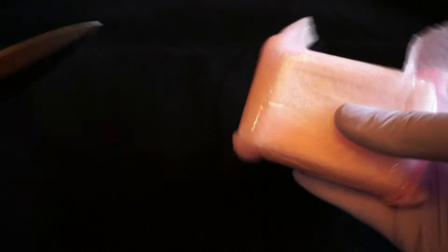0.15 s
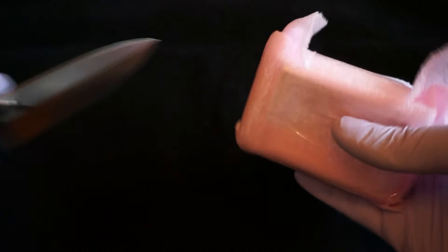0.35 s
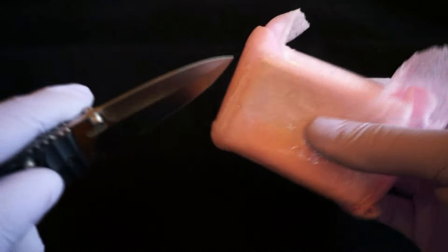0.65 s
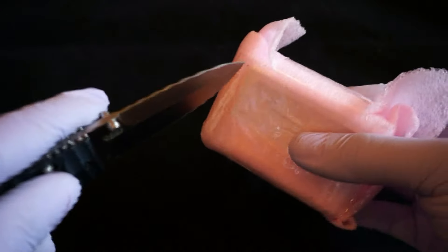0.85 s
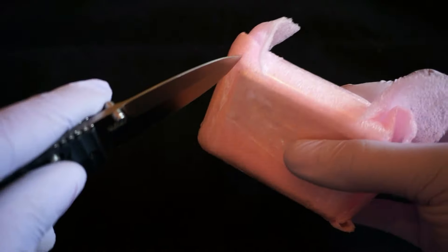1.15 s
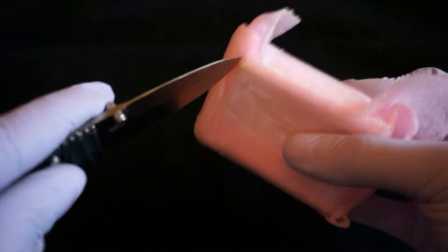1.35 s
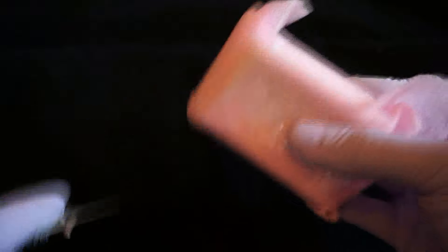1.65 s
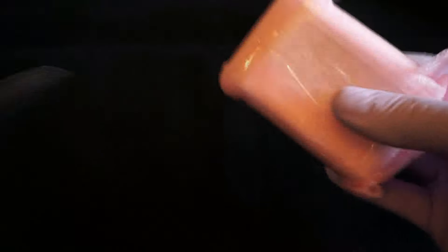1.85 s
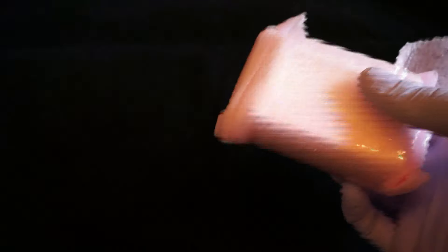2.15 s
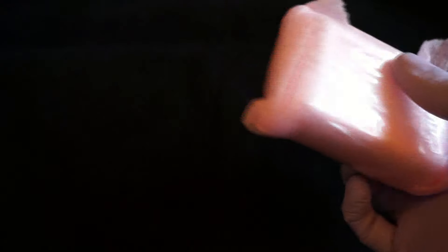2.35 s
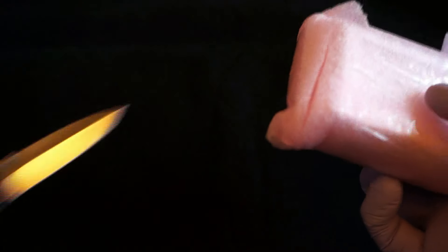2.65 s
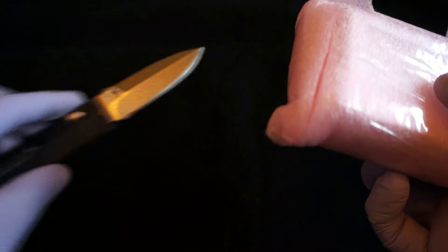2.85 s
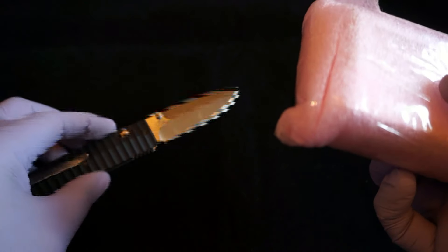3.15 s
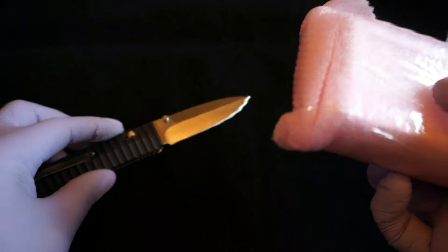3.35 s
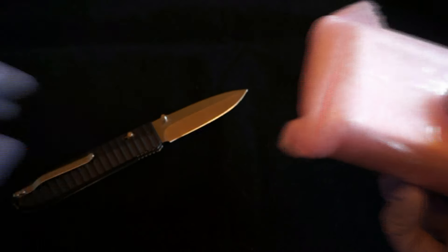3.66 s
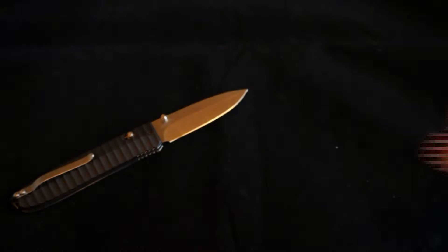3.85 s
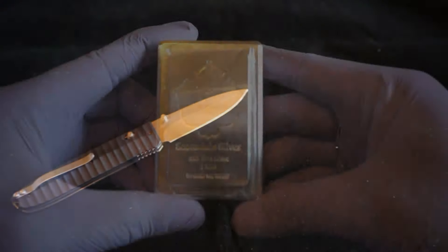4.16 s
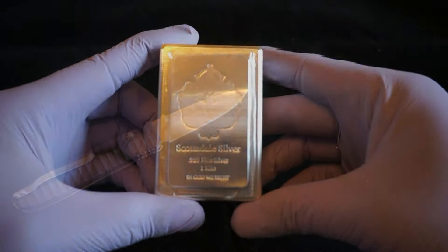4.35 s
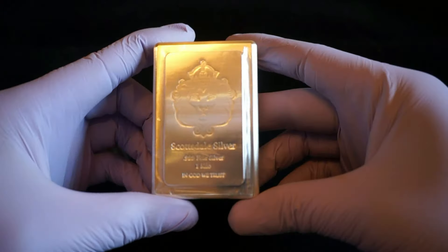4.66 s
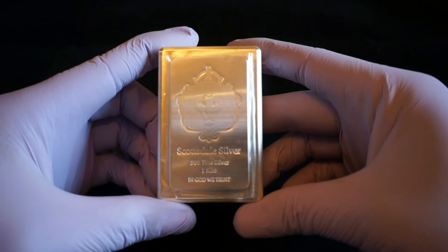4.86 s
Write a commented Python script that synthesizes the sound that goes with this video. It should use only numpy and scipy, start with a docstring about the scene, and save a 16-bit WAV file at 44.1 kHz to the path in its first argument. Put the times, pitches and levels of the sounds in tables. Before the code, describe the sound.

A quiet room, heard very close in stereo, with faint hiss, a barely audible hum in the first second and short room echo. From 0.15 to 0.85 s gloves stutter over foam in tiny squeaks, bright chirps around 0.2 s, lower groaning ones with a rasp near 0.4 s, then thinner, fainter ones. Dry snaps tick at 0.73, 0.78 and 0.92 s amid fine rustling. Small ticks and a faint creak lead up to the cut: at 1.5 s the foam rips with loud, sharp snaps, creaks about 1.6 s, and rips again at 1.67 s. A falling squeak comes at 2.05 s, then soft crumpling with a crisp snap at 2.6 s. After a faint touch at 3.25 s, the knife lands around 3.6 s in a quick dull triple clatter. Light squeaks on plastic follow at 3.96 to 4.3 s, with a muffled bump near 4.96 s.

```python
"""Foam wrapper cut open

Gloved hands slit a foam wrapper with a knife, close to a microphone pair in a quiet room.
Stick-slip pulse trains squeak (gloves on foam, then on a plastic case) and creak (blade in foam).
Dense impulses rip in two short bursts; damped sines snap; crackle rustles; filtered noise rasps and slides.
Knocks on the table are a push, a clatter and ringing modes; a faint hum and hiss lie beneath."""
import sys
import numpy as np
from scipy import signal
from scipy.fft import rfft, irfft, next_fast_len
from scipy.io import wavfile
from scipy.ndimage import map_coordinates

SR = 44100
rng = np.random.default_rng(int(sys.argv[2]) if len(sys.argv) > 2 else 0)


def to_wav(s):
    """Save 16-bit WAV."""
    ch = np.atleast_2d(s).T  # columns
    pcm = np.round(np.clip(ch, -1, 1) * 32767)  # PCM
    wavfile.write(sys.argv[1], SR, pcm.astype(np.int16))


N = 220361
TIME_S = np.arange(N) / SR
TOP_HZ = 15900  # band limit of the recorder

# glove strokes on foam: [start t/s, length/s, crest/share 0-1, level/dB, first slip f/Hz, last slip f/Hz,
# bow of glide/octaves, roughness/0-1, spot resonance f/Hz]
FOAM_STROKES = [ (.144, 0.04, 0.67, -33.5, 788, 765, 0.03, 0.59, 3260),
                (.191, 0.026, 0.46, -28, 1210, 2235, -0.0071, 0.23, 3480),
                (.209, .032, 0.63, -25, 2191, 2555, -.1, .6, 4600),
                (.232, 0.044, 0.43, -24, 2708, 1007, -0.2, 0.5, 3970),
                (.384, 0.052, 0.86, -29.5, 489.3, 505, 0.32, 0.19, 2030),
                (.42, 0.068, 0.81, -31, 490.5, 383, 0, 0.44, 2060),
                (.501, 0.038, 0.4, -30, 3300, 1814, -0.12, 0.17, 5200),
                (.527, 0.066, 0.6, -37.5, 1798, 2124, 0.07, 0.17, 5570),
                (.592, .014, 0.56, -33, 2350, 5000, .05, .1, 3430),
                (.622, .061, 0.45, -39.5, 819, 493, 0.17, 0.07, 1700),
                (.695, .032, 0.67, -40, 3100, 12940, -0.056, 0.3, 5350),
                (.787, 0.046, 0.3, -43.5, 13000, 3960, 0, 0.27, 6600),
                (.81, .032, 0.3, -40.5, 3785, 1280, -0.0093, 0.4, 2320),
                (1.994, 0.067, 0.35, -39.5, 5300, 6570, 0.33, 0.37, 6900),
                (2.055, 0.082, 0, -28.5, 6855, 1560, 0.25, 0.2, 5050),
                (2.054, 0.073, 0.28, -36, 3390, 1308, 0.02, 0.58, 3270), ]
# spectrum of a squeak: [f/Hz, level/dB]
SQUEAK_COLOUR = [(100, -36), (450, -17.5), (1100, -3.5), (2050, 0.5), (2750, 2), (3900, 0), (6400, -8.5),
                 (15000, -30)]


def foam_squeaks():
    """Gloves stick and slip on foam; each slip is one pulse."""
    strokes = glides(FOAM_STROKES, rise_db=5.5, fall_db=8, shape=1.02)
    return stick_slip(strokes, SQUEAK_COLOUR, jitter=0.125, jitter_rate_hz=500, flutter_db=2.5,
                      hiss=0.97, pure_hz=3870, ring=0.9)


# blade in the cut, one curve per creak: [t/s, slip f/Hz, level/dB]
CREAK_CURVES = [
    [(1.375, 235.3, -40), (1.4, 213.3, -39)],
    [(1.575, 328.3, -32.5), (1.594, 283.3, -25), (1.607, 317.2, -25), (1.629, 327.5, -23.5),
     (1.664, 307.8, -24)],
]
# spectrum of a creak: [f/Hz, level/dB]
CREAK_COLOUR = [(100, -59), (320, -25), (620, -8.5), (1400, -6.5), (2000, -12.5), (2700, -4.5),
                (3700, -6.5), (5200, -20), (15000, -33)]


def blade_creaks(spot_hz=2900, rough=0.096):
    """The blade sticks and slips slowly enough to creak; each curve is one push."""
    strokes = []
    for curve in CREAK_CURVES:
        knot_s, slip_hz, level_db = np.transpose(curve)
        length_s = knot_s[-1] - knot_s[0]
        t = knot_s[0] + span(length_s) * length_s
        hz, db = np.interp(t, knot_s, slip_hz), np.interp(t, knot_s, level_db)
        strokes.append((knot_s[0], rough, spot_hz, hz, db))
    return stick_slip(strokes, CREAK_COLOUR, jitter=0.19, jitter_rate_hz=285, flutter_db=1.8,
                      hiss=2.2, pure_hz=np.inf, ring=0.41)


# foam giving way: [start t/s, length/s, level/dB, sag over length/dB, lower edge f/Hz]
RIPS = [(1.490, 0.035, -18, 12, 920), (1.666, .036, -18, .5, 300)]
# spectrum of a rip: [f/Hz, level/dB]
RIP_COLOUR = [(100, -43.5), (457, -10), (1700, -1), (4460, -3.5), (15500, -13.5)]
STRAIN_DB, STRAIN_S = -9, 0.0043  # first cells, ahead of the rip: level re rip, rise time constant
SETTLE_DB, SETTLE_S = -11.5, 0.018  # last cells, after it: level re sagged rip, decay time constant


def rips():
    """Cell walls burst in a dense volley: strain builds, the foam gives, the force sags and stops."""
    out = np.zeros(N)
    for start_s, length_s, db, sag_db, low_hz in RIPS:
        cells = crackle(rate_hz=7000, spread_db=2.5) + .5 * rng.standard_normal(N)

        def foam(x):
            """Foam colour above the lower edge."""
            return passed(coloured(x, RIP_COLOUR), low_hz, "highpass", order=1)

        t = TIME_S - start_s
        strain = amp(STRAIN_DB) * np.exp(-np.abs(t) / STRAIN_S)
        settle = amp(SETTLE_DB - sag_db) * np.exp(-np.abs(t - length_s) / SETTLE_S)
        run = amp(-sag_db * np.clip(t / length_s, 0, 1))
        force = amp(db) * np.select([t < 0, t < length_s], [strain, run], settle)
        out += foam(force * cells) / np.std(foam(cells))
    return out


# single snaps of the wrapper: [t/s, peak level/dB, centre f/Hz]
SNAPS = [(.7333, -19, 4230), (.783, -25, 5670), (.922, -28, 3750), (1.185, -34, 3630), (1.205, -33, 2230),
         (1.227, -29, 6370), (1.3755, -31, 4670), (1.516, -11, 5500), (1.518, -5.5, 6600),
         (1.538, -16.5, 7500), (1.5726, -14, 6560), (2.45, -31.5, 3000), (2.5, -36, 1500),
         (2.5673, -28.5, 5360), (2.594, -20, 3380), (2.64, -37, 3500), (2.696, -36, 3480),
         (3.0242, -38.5, 2230), (3.722, -34.5, 3880)]


def snaps(cycles=1.33, fizz=0.38, fizz_t60_s=0.0067):
    """The taut skin swings a cycle or two with a short noise spray; so light a skin gives no bass."""
    out, t = np.zeros(N), np.arange(SR // 50) / SR
    for start_s, peak_db, hz in SNAPS:
        ring = np.sin(2 * np.pi * hz * t) * np.exp(-hz * t / cycles)
        noise = fizz * rng.standard_normal(len(t)) * amp(-60 * t / fizz_t60_s)
        spray = passed(noise, 2 * hz, "lowpass", order=2)
        click = passed(ring + spray, hz / 4, "highpass", order=2)
        add(out, start_s, amp(peak_db) * click / np.abs(click).max())
    return out


# strokes on the hard plastic case: [start t/s, length/s, crest/share 0-1, level/dB, first slip f/Hz,
# last slip f/Hz, bow of glide/octaves, roughness/0-1, spot resonance f/Hz]
CASE_STROKES = [ (3.96, 0.041, 0.54, -34.5, 998, 2270, -0.11, 0.15, 3200),
                (3.997, 0.052, .25, -40.5, 1734, 1902, -0.12, 0.75, 1900),
                (4.156, .068, 0.45, -36.5, 1787, 3147, .38, 0.31, 6040),
                (4.203, .044, 0.16, -39, 2482, 1628, -0.023, 0.43, 2180),
                (4.275, 0.046, 0.6, -53.5, 6000, 7040, 0.065, 0.83, 6800), ]


def case_squeaks():
    """Gloves stick and slip on plastic; fast slips round off at a lower rate than on foam."""
    strokes = glides(CASE_STROKES, rise_db=12, fall_db=7.5, shape=0.77)
    return stick_slip(strokes, SQUEAK_COLOUR, jitter=0.089, jitter_rate_hz=500, flutter_db=-0.5,
                      hiss=1.0, pure_hz=1800, ring=0.62)


# glove dragged over foam: [start t/s, length/s, crest/share 0-1, level/dB]
SCRATCHES = [(.388, 0.12, 0.5, -37.5), (2.055, 0.11, 0.2, -45.5)]


def scratch():
    """The glove drags over open cells: a bright, fluttering rasp that swells and fades."""
    bright = passed(crackle(rate_hz=15000, spread_db=5.5), [5000, 13000], "bandpass", order=1)
    rasp = unit(bright * amp(1.8 * wobble(500, N)))
    return rubs(SCRATCHES, rise_db=8, fall_db=14, shape=1.8) * rasp


# blows on the table: [t/s, level/dB, softness as cut-off f/Hz, time for clatter to fall 30 dB/s]
KNOCKS = [(3.246, -44, 553, 0.1), (3.6107, -25.5, 1590, 0.036), (3.622, -25, 1480, 0.14),
          (3.644, -28.5, 1660, 0.07), (4.101, -54, 940, 0.43), (4.752, -56, 2120, .13),
          (4.964, -39.5, 360, 0.038)]
# modes of the table top: [f/Hz, relative level/dB]
TABLE_MODES = [(290, 0), (600, 7.5), (662, 8.5), (774, 1.5), (1175, -6.5), (1308, -5)]


def knocks(ring_db=-12.5, ring_t60_s=0.18, clatter_db=0.5, push_s=0.00048):
    """Knife and hands meet the cloth-covered table: a dull push, a clatter and the top's modes."""
    out, t = np.zeros(N), np.arange(SR // 2) / SR
    for start_s, db, soft_hz, length_s in KNOCKS:
        ring = np.zeros(len(t))
        for hz, mode_db in TABLE_MODES:
            gain = amp(mode_db + rng.normal(0, 0.44)) * rng.choice([-1, 1])
            ring += gain * np.sin(2 * np.pi * hz * t)
        noise = unit(passed(rng.standard_normal(len(t)), [280, 1800], "bandpass", order=2))
        clatter = noise * amp(-60 * t / (2 * length_s))
        u = t / push_s
        push = 4 * (1 - u) * np.exp(-u)
        impact = amp(ring_db - 60 * t / ring_t60_s) * ring + amp(clatter_db) * clatter + push
        blow = passed(impact, soft_hz, "lowpass", order=4)
        add(out, start_s, amp(db) * passed(blow, 110, "highpass", order=7))
    return out


# wrapper and gloves shifting in the hand: [start t/s, length/s, crest/share 0-1, level/dB]
RUSTLES = [(0, 0.25, 0, -56.5), (.2, 0.81, .5, -51), (.9, 2.48, 0.42, -56.5), (1.43, 0.058, 0.7, -50),
           (3.77, 0.13, 0.77, -53.5), (3.87, 0.55, 0.43, -57)]
# spectrum of the fine crackle: [f/Hz, level/dB]
RUSTLE_COLOUR = [(200, -24.5), (1400, 0.5), (3000, -1), (15000, -7)]
# thumb working the wrapper: [start t/s, length/s, crest/share 0-1, level/dB]
CRUMPLES = [(2.19, 0.14, 0.6, -52), (2.56, 0.29, 0.34, -50.5)]
# spectrum of the coarse crackle: [f/Hz, level/dB]
CRUMPLE_COLOUR = [(150, -41), (700, -2.5), (2500, 6), (15000, -9.5)]


def rustle():
    """Fine crackle of the wrapper as it is held, coarser clumps where the thumb presses."""
    fine = unit(coloured(crackle(rate_hz=3200, spread_db=2.0), RUSTLE_COLOUR))
    fine = fine * amp(2.8 * wobble(29.976, N))
    coarse = coloured(crackle(rate_hz=1700, spread_db=5), CRUMPLE_COLOUR)
    coarse = unit(coarse * amp(2.8 * wobble(70, N)))
    held = rubs(RUSTLES, rise_db=-4, fall_db=16.0, shape=2.7) * fine
    pressed = rubs(CRUMPLES, rise_db=16, fall_db=17, shape=2.5) * coarse
    return held + pressed


# sleeve sliding on the table: [start t/s, length/s, crest/share 0-1, level/dB]
SLIDES = [(.37, 0.73, 0.13, -63.5), (3.04, .36, .37, -66.5)]


def slide():
    """Soft rubbing brings out one low band of the table, a hollow drone."""
    drone = unit(passed(rng.standard_normal(N), [295, 410], "bandpass", order=2))
    return rubs(SLIDES, rise_db=11, fall_db=8.5, shape=1.1) * drone


# faint hum in the room: [start t/s, length/s, crest/share 0-1, level/dB]
HUMS = [(0, 1.12, 1, -66.5)]


def hum(centre_hz=392):
    """A thin, faint tone that wavers a little as it swells."""
    phase = 2 * np.pi * np.cumsum(centre_hz + 2 * wobble(9.5, N)) / SR
    return rubs(HUMS, rise_db=8, fall_db=3, shape=0.71) * unit(np.sin(phase))


# spectrum of the noise floor: [f/Hz, level/dB]
FLOOR_COLOUR = [(24, -116), (40, -36), (333, -8), (1160, -11), (1280, -4), (1910, -12), (3840, -14),
                (4900, -4.5), (5440, -16), (15500, -12.5)]


def floor():
    """Faint room air and microphone hiss: coloured noise, partly different in each channel."""
    mid, side = unit(coloured(rng.standard_normal((2, N)), FLOOR_COLOUR))
    return amp(-61.5) * np.array([mid + 0.34 * side, mid - 0.25 * side])


# spectrum of the echo at its start: [f/Hz, level/dB]
ROOM_COLOUR = [(150, -7.5), (2500, -3.5), (14000, -2)]
# echo decay by 60 dB: [f/Hz, time/s]
ROOM_T60 = [(200, 0.44), (4000, 0.38), (15000, 0.26)]


def room(x, wet_db, width):
    """The room's answer, mostly common to both channels; treble dies first."""
    hz, t, z = signal.stft(rng.standard_normal((2, SR // 2)), SR, nperseg=256)
    decay_db = along(ROOM_COLOUR, hz)[:, None] - 60 * t / along(ROOM_T60, hz)[:, None]
    tail = signal.istft(z * amp(decay_db), SR, nperseg=256)[1]
    tail = np.pad(tail / np.linalg.norm(tail[0]), ((0, 0), (SR // 250, 0)))  # 4 ms pre-delay
    mid, side = amp(wet_db) * signal.fftconvolve(x[None], tail, axes=1)[:, :N]
    side = width * passed(side, [260, 5000], "bandpass", order=1)
    return np.array([mid + side, mid - side])


def placed(x, lean, wet_db, beam_hz):
    """Lean left (+) or right (-) in the middle band; treble above beam_hz hardly reaches the walls."""
    side = lean * passed(x, [900, 3500], "bandpass", order=1)
    to_walls = passed(x, beam_hz, "lowpass", order=2)
    return np.array([x + side, x - side]) + room(to_walls, wet_db, width=0.42)


def stick_slip(strokes, colour, jitter, jitter_rate_hz, flutter_db, hiss, pure_hz, ring):
    """Each slip kicks the surface once; rough strokes slip unevenly and scrape in between."""
    out = np.zeros(N)
    for start_s, rough, spot_hz, hz, db in strokes:
        size = len(hz)
        rate_hz = hz * np.exp(jitter * rough * wobble(jitter_rate_hz, size))
        phase = 2 * np.pi * np.cumsum(rate_hz) / SR
        k = np.arange(1, int(TOP_HZ / rate_hz.min()) + 2)[:, None]
        # fast slips round off into a whistle
        overtones = (k * rate_hz < SR / 2) * k ** (-rate_hz / pure_hz)
        heard = overtones * amp(along(colour, k * rate_hz))
        strength = np.sqrt(np.sum(heard ** 2, 0) / 2 + 1e-9)
        pulses = np.sum(overtones * np.cos(k * phase), 0) / strength
        slips = unit(patch(coloured(pulses, colour), ring, ring_t60_s=0.01))
        scrape = unit(coloured(rng.standard_normal(size) * (1 + np.cos(phase)), colour))
        grip = amp(flutter_db * wobble(258, size))
        contact = unit(spot(grip * (slips + hiss * rough * scrape), spot_hz))
        add(out, start_s, edges(span(size / SR), edge_s=0.00022) * amp(db) * contact)
    return out


def glides(rows, rise_db, fall_db, shape):
    """The slip rate glides in one bowed sweep as the finger speeds up or slows."""
    strokes = []
    for start_s, length_s, crest, db, first_hz, last_hz, bow, rough, spot_hz in rows:
        u = span(length_s)
        hz = first_hz * (last_hz / first_hz) ** u * 2 ** (bow * (1 - (2 * u - 1) ** 2))
        level_db = db + pressure(u, crest, rise_db, fall_db, shape)
        strokes.append((start_s, rough, spot_hz, hz, level_db))
    return strokes


def patch(x, ring, ring_t60_s):
    """The stretched skin round a contact rings briefly, with new modes at each spot."""
    t = np.arange(SR // 60) / SR
    response = rng.standard_normal(len(t)) * amp(-60 * t / ring_t60_s)
    return x + ring * signal.fftconvolve(x, response / np.linalg.norm(response))[:len(x)]


def spot(x, hz, gain_db=1.5, edge_ratio=1.12):
    """The touched spot favours its own resonance and, more weakly, the octave above."""
    def band(centre_hz):
        """Narrow band of x."""
        return passed(x, [centre_hz / edge_ratio, centre_hz * edge_ratio], "bandpass", order=1)

    return x + amp(gain_db) * (band(hz) + .5 * band(2 * hz))


def pressure(u, crest, rise_db, fall_db, shape):
    """Stroke level in dB: touch down, press harder up to the crest, ease off and lift."""
    crest = np.clip(crest, .02, .98)
    contact = np.clip(np.minimum(2 * u / crest, 20 * (1 - u)), 1e-3, 1)
    rise = rise_db * np.maximum(1 - u / crest, 0) ** shape
    fall = fall_db * np.maximum((u - crest) / (1 - crest), 0) ** shape
    return 20 * np.log10(contact) - rise - fall


def rubs(rows, rise_db, fall_db, shape):
    """Gain over the whole scene of a series of rubbing strokes."""
    gain = np.zeros(N)
    for start_s, length_s, crest, db in rows:
        add(gain, start_s, amp(db + pressure(span(length_s), crest, rise_db, fall_db, shape)))
    return gain


def span(length_s):
    """Share 0-1 of a stroke done at each of its samples."""
    return np.linspace(0, 1, max(round(length_s * SR), 64))


def edges(u, edge_s):
    """Gain that opens as a contact begins and closes as it ends."""
    return np.clip(np.minimum(u, 1 - u) * len(u) / (edge_s * SR), 0, 1)


def crackle(rate_hz, spread_db):
    """Random impulses of scattered size, rms 1."""
    sizes = amp(spread_db * np.clip(rng.standard_normal(N), -2, 2)) * rng.choice([-1, 1], N)
    return unit(sizes * (rng.random(N) < rate_hz / SR))


def wobble(rate_hz, size):
    """Smooth random curve with rate_hz knots a second."""
    knots = rng.standard_normal(int(size * rate_hz / SR) + 4)
    return map_coordinates(knots, [np.arange(size) * rate_hz / SR])


def coloured(x, points):
    """x through a causal minimum-phase filter with the (Hz, dB) response."""
    size = x.shape[-1]
    m = 2 * next_fast_len(size // 2 + 2048)
    cepstrum = irfft(np.log(amp(along(points, np.fft.rfftfreq(m, 1 / SR)))))
    cepstrum[1:m // 2] *= 2  # fold onto positive time
    cepstrum[m // 2 + 1:] = 0
    return irfft(rfft(x, m) * np.exp(rfft(cepstrum)))[..., :size]


def passed(x, hz, kind, order):
    """Butterworth filter."""
    sos = signal.butter(order, np.clip(hz, 10, SR * .49), kind, fs=SR, output="sos")
    return signal.sosfilt(sos, x)


def along(points, hz):
    """(Hz, value) points read on a log frequency axis."""
    f, v = np.transpose(points)
    return np.interp(np.log(hz + 1), np.log(f), v)


def amp(db):
    """Gain of a level in dB."""
    return 10 ** (np.asarray(db) / 20)


def unit(x):
    """x at rms 1."""
    return x / np.sqrt(np.mean(x ** 2) + 1e-20)


def add(track, start_s, x):
    """Mix x into the track from start_s."""
    start = max(round(start_s * SR), 0)
    part = track[start:start + len(x)]
    part += x[:len(part)]


def scene():
    """Gloves, blade, wrapper and table in the room."""
    gloves = foam_squeaks() + case_squeaks() + scratch()
    wrapper = blade_creaks() + rips() + snaps() + rustle()
    table = knocks() + slide()
    return (placed(gloves, lean=-0.5, wet_db=-6.5, beam_hz=4350)
            + placed(wrapper, lean=-0.27, wet_db=-10.0, beam_hz=14000)
            + placed(table, lean=0, wet_db=-3.0, beam_hz=5000)
            + hum() + floor())


def record(dry):
    """Nothing is kept above the recorder's band limit."""
    m = next_fast_len(N + SR // 4)
    kept = np.fft.rfftfreq(m, 1 / SR) < TOP_HZ
    return irfft(rfft(dry, m) * kept, m)[:, :N]


dry = scene()
out = record(dry)
to_wav(out)
```